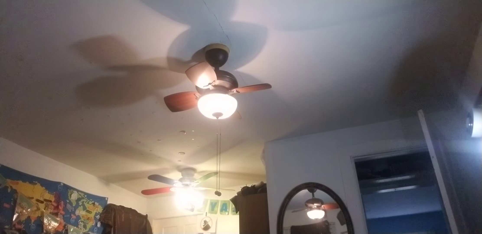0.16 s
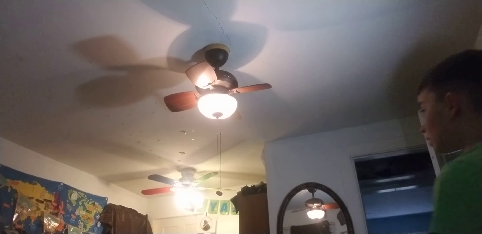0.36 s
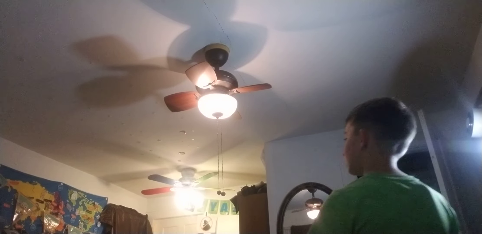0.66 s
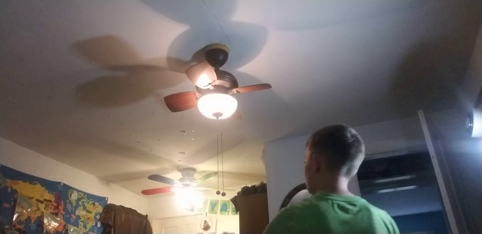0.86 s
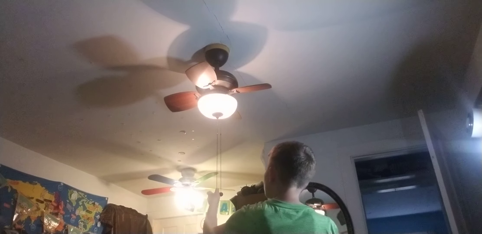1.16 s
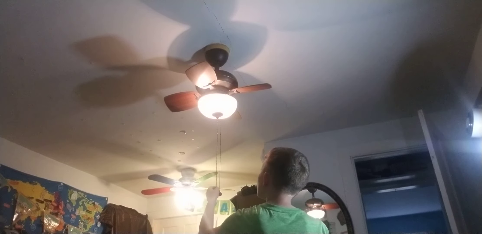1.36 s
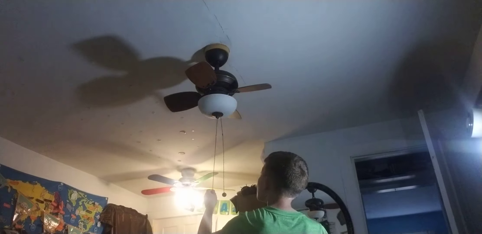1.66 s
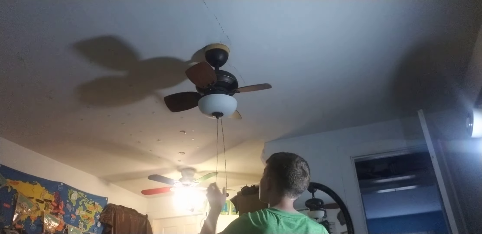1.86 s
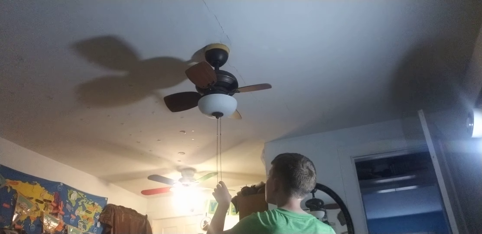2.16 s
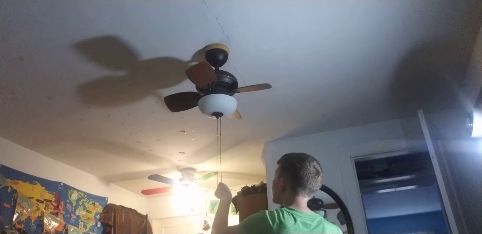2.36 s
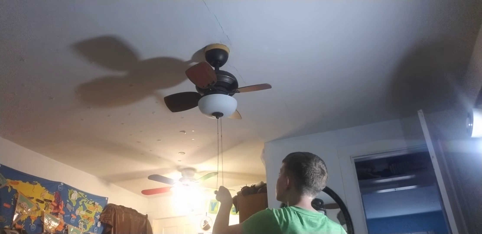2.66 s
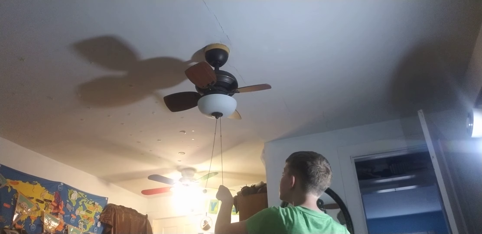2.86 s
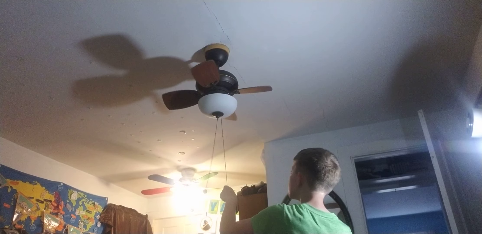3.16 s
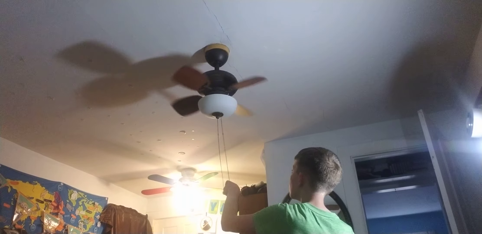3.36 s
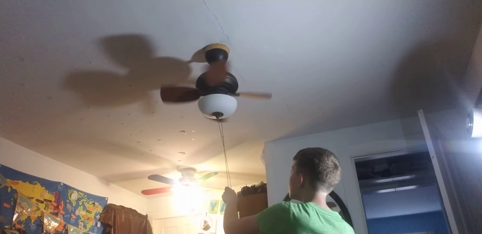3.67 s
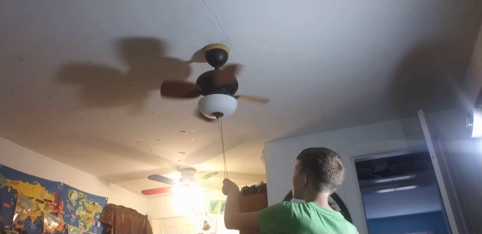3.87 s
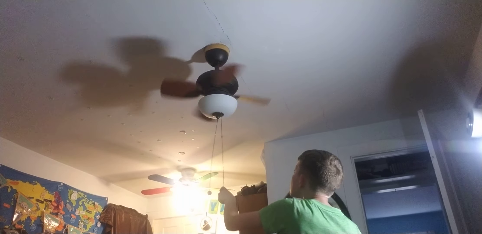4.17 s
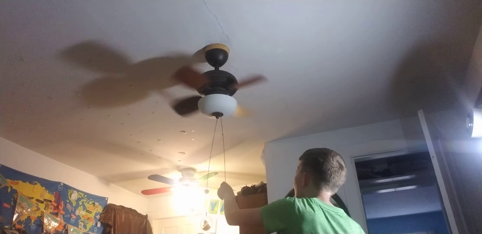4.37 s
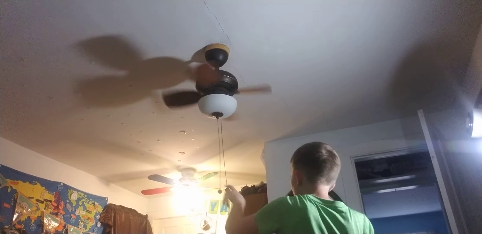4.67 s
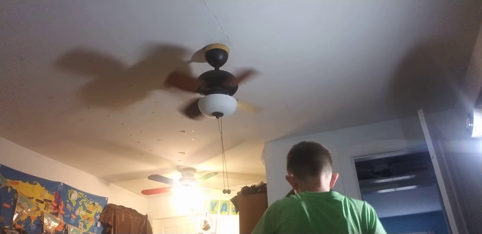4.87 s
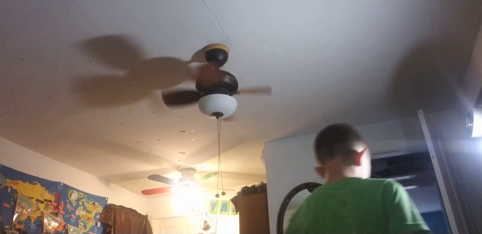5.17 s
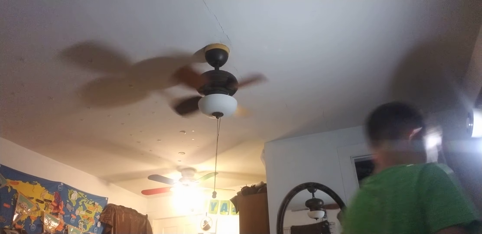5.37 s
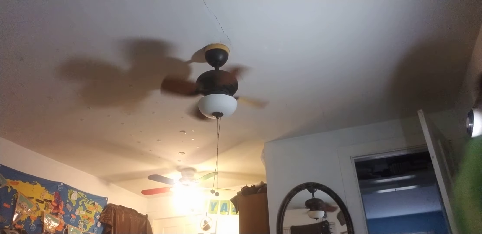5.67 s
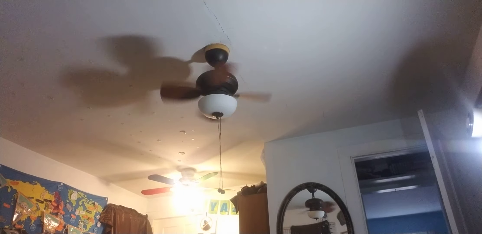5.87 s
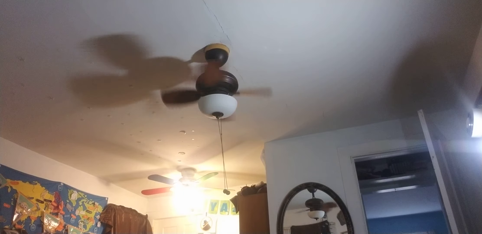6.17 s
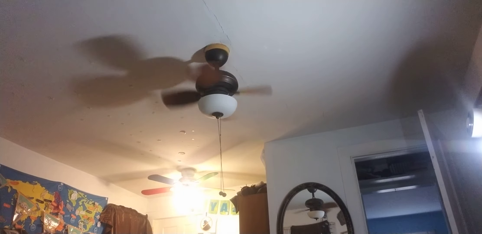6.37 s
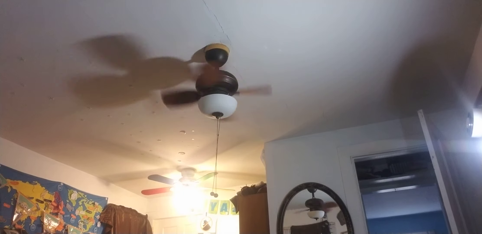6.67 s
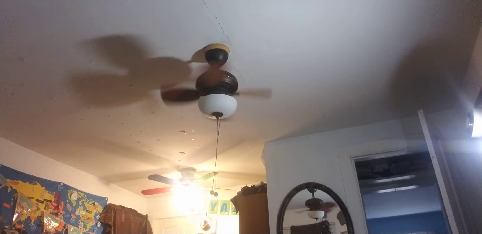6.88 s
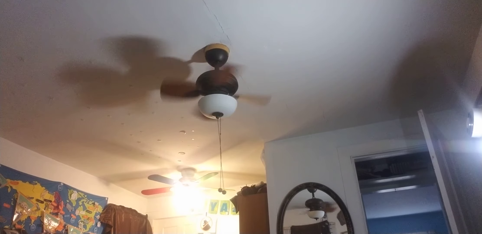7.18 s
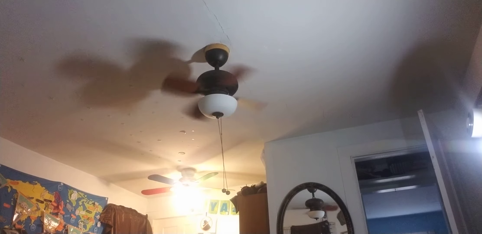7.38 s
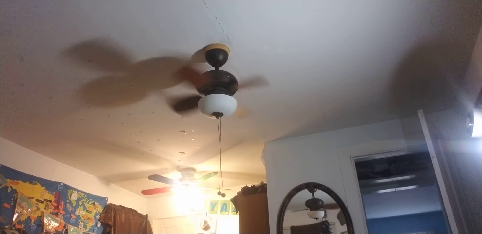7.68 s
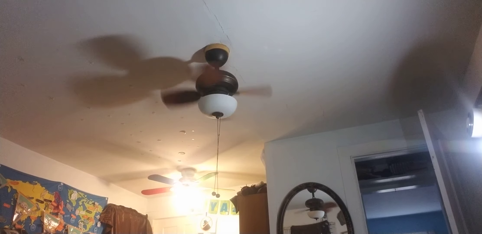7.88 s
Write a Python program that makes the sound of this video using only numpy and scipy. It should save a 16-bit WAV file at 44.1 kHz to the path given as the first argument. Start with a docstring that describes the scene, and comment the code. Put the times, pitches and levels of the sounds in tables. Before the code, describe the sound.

Footsteps approach, a fan's pull chain rasps and clicks repeatedly over a steady low motor hum, then the steps move away.

```python
"""A ceiling fan's pull chains, tugged by a child: once for the light, then several times for the speed.
At each stroke the ball chain goes taut, rasps through its ferrule and catches; then the ratchet switch
snaps, ringing canopy and housing by turns. The dropped pendant clinks. Footsteps boom in the floor and
clothes swish on the way in and out. The stereo microphone stands in a living room, with a motor's hum
and a soft rush of air under everything and two faint, far squeaks at the end."""
import sys
import numpy as np
from scipy import signal
from scipy.fft import rfft, irfft, next_fast_len
from scipy.io import wavfile
from scipy.ndimage import uniform_filter1d, map_coordinates

SR = 44100
rng = np.random.default_rng(int(sys.argv[2]) if len(sys.argv) > 2 else 0)


def waveform_to_disk(signal):
    """Save audio, clipped to [-1, 1], as 16-bit WAV at the path in sys.argv[1]."""
    frames = np.transpose(np.atleast_2d(signal))
    scaled = np.clip(frames, -1, 1) * 32767
    samples = np.round(scaled).astype(np.int16)
    wavfile.write(sys.argv[1], SR, samples)


N = 354167

# Tugs on the chain. Negative seat lands the pawl on the canopy side, positive on the housing side.
# snap_s, snap_db, seat, spring_lift_db, taut_before_snap_s, chain_db, catch_before_snap_s, catch_db
TUGS = [(1.552, -35, 0.081, 11, 0.039, -61, 0.021, -56),
        (1.7204, -39.5, -0.074, -2.5, 0.057, -54, 0.019, -56),
        (2.631, -41, -0.48, -4.5, 0.065, -50.5, .028, -49), (2.938, -32.5, -.9, 1.5, 0.3, -58, .02, -65),
        (3.228, -35.5, 1.1, -0.5, 0.07, -46, .02, -43), (3.528, -32.5, -1.05, 2, 0.073, -44.5, 0.033, -40),
        (3.7951, -32.5, 0.64, 2, .049, -51.5, 0.018, -42.5),
        (4.071, -32.5, -0.84, 0.5, .068, -50.5, 0.035, -38),
        (4.372, -34.5, 1.5, -0.5, 0.087, -49.5, 0.039, -45)]
# Spectrum of the ball chain against its ferrule: frequency_hz, gain_db
CHAIN_SPECTRUM = [(300, -7.5), (900, -4.5), (2200, -10), (3300, -15), (4200, -4.5), (5400, -15),
                  (6400, -6.5), (6850, 3), (7500, -13), (9500, -4), (12200, -1), (15500, -4.5)]


def amp(db):
    """Decibels to gain."""
    return 10 ** (np.asarray(db) / 20)


def unit(x):
    """Scale to rms 1."""
    return x / np.sqrt(np.mean(x ** 2) + 1e-20)


def along(points, hz):
    """Read a curve of (frequency_hz, value) points on a log frequency axis."""
    frequencies, values = np.transpose(points)
    return np.interp(np.log(hz + 1), np.log(frequencies + 1), values)


def peak(hz, centre, width):
    """Bell shape of one resonance, 1 at its centre."""
    return 1 / (1 + (2 * (hz - centre) / width) ** 2)


def clock(seconds):
    """Sample times of a stretch."""
    return np.arange(max(int(seconds * SR), 2)) / SR


def wobble(rate_hz):
    """A smooth random curve through rate_hz knots a second."""
    knots = rng.standard_normal(int(N * rate_hz / SR) + 4)
    return map_coordinates(knots, [np.arange(N) * rate_hz / SR])


def filtered(x, response):
    """Weight the spectrum of x by a gain that depends on frequency."""
    size = next_fast_len(N + SR // 2)
    return irfft(rfft(x, size) * response(np.fft.rfftfreq(size, 1 / SR)), size)[..., :N]


def body(x, gain_db, size=4096):
    """Ring x through a minimum-phase body with the given dB curve of frequency."""
    cepstrum = irfft(np.log(amp(gain_db(np.fft.rfftfreq(size, 1 / SR)))))
    cepstrum[1:size // 2] *= 2
    cepstrum[size // 2 + 1:] = 0
    return signal.fftconvolve(x, irfft(np.exp(rfft(cepstrum))))


def burst(life_s):
    """A short contact: a dying scatter of tiny impacts that carries all frequencies about equally."""
    t = clock(life_s * 8)
    impacts = rng.standard_normal(len(t)) * np.exp(-t / life_s)
    fade = np.cos(np.pi / 2 * t / t[-1]) ** 2
    for _ in range(3):  # each pass flattens the spectrum
        spectrum = rfft(impacts)
        impacts = irfft(spectrum / (np.abs(spectrum) + 1e-9), len(t)) * fade
    return impacts


def stereo_pair(spectra, hz):
    """Two unrelated spectra become the microphone's left and right, alike in the bass."""
    # Likeness of the two channels: frequency_hz, correlation
    likeness = [(120, 0.82), (300, 0.8), (700, 0.39), (1500, 0), (6000, 0)]
    turn = np.arccos(np.clip(along(likeness, hz), -1, 1)) / 2
    mid, side = spectra[0] * np.cos(turn), spectra[1] * np.sin(turn)
    return np.array([mid + side, mid - side])


def in_room(x, direct_db, early_db):
    """The path to the microphone: direct sound, a quick scatter off the ceiling and a diffuse tail."""
    # Reverberation of the living room: frequency_hz, t60_s
    decay = [(100, 0.2), (300, 0.32), (800, 0.25), (2100, 0.3), (5500, 0.24), (14600, 0.2)]
    hz, t, noise = signal.stft(rng.standard_normal((2, 16384)), SR, nperseg=256)
    frames = stereo_pair(noise.transpose(0, 2, 1), hz) * amp(-60 * t[:, None] / along(decay, hz))
    response = signal.istft(frames.transpose(0, 2, 1), SR, nperseg=256)[1]
    t = np.arange(response.shape[1]) / SR
    response *= (1 - np.exp(-t / .0009)) * (1 + amp(early_db) * np.exp(-t / .0035))
    response /= np.linalg.norm(response[0])
    response[:, 0] += amp(direct_db)
    return signal.fftconvolve(x[None], response, axes=1)


def add(track, start_s, sound, db, seconds):
    """Lay a sound in at start_s; db is its rms over the opening seconds."""
    start = round(start_s * SR)
    part = sound[:, max(-start, 0):N - start]
    level = np.sqrt(np.mean(sound[:, :int(seconds * SR)] ** 2))
    track[:, max(start, 0):][:, :part.shape[1]] += part * amp(db) / level


def motor():
    """Magnetic hum at twice the mains, rotor vibration, their sum tone and thin whines."""
    # Course of the rotor's once-a-turn vibration: time_s, relative_db
    vibration = [(0.0, -46.5), (2.01, -55.5), (2.21, -56), (3.26, -51.5), (4.9, -47), (6.31, -50),
                 (6.49, -49), (7.69, -57), (8.03, -64)]
    # Faint whines of the motor housing: pitch_hz, level_db
    whines = [(81.8, -65), (360, -75), (651, -78), (760, -79), (1092, -74), (1114, -80)]
    magnetic_hz, rotor_hz = 120.03, 58.37
    t = np.arange(N) / SR
    magnetic_phase = 2 * np.pi * magnetic_hz * t + .014 * wobble(1.4)
    rotor_phase = 2 * np.pi * rotor_hz * t + .2 * wobble(1.5)
    hum = amp(-41 + .7 * wobble(7)) * np.sin(magnetic_phase)
    hum += amp(.5 + np.interp(t, *np.transpose(vibration))) * np.sin(rotor_phase)
    hum += amp(-57 + 2 * wobble(3.7)) * np.sin(magnetic_phase + rotor_phase)
    for hz, db in whines:
        hum += amp(db + 1.8 * wobble(5)) * np.sin(2 * np.pi * hz * t + .7 * wobble(5))
    return np.sqrt(2) * hum


def air():
    """A soft, dull rush of moving air that wavers a little in level."""
    # Spectrum of the moving air: frequency_hz, gain_db
    spectrum = [(25, -8.5), (55, -2.5), (90, -0.5), (160, -2), (240, -6.5), (500, -12.5), (1100, -17),
                (1350, -24.5), (2100, -34), (5000, -40.5), (8500, -42), (12000, -39.5), (12800, -32.5),
                (13600, -41)]
    level_db = -52.5
    rush = filtered(rng.standard_normal((2, N)), lambda hz: amp(along(spectrum, hz)))
    rush = irfft(stereo_pair(rfft(rush), np.fft.rfftfreq(N, 1 / SR)), N)
    return unit(rush) * amp(level_db + .8 * wobble(2.6))


def clothes():
    """Cloth and soles slide in soft, grainy swells; a scuffing sole also rings the floor."""
    # Clear swishes of cloth and soles, and at 4.61 s the released chain sliding through the hand: centre_s,
    # half_length_s, level_db, scuff_db, treble_db
    swishes = [(0.028, 0.049, -59, 2, 7.5), (0.887, .029, -59.5, 11, 0), (1.257, .04, -56, 0.5, -7),
               (4.61, 0.035, -63.5, -20, 15), (5.266, 0.024, -66, -7, -2), (5.338, .037, -62, 10, 1),
               (5.436, 0.025, -59, -1, 2), (5.595, 0.012, -66, -37, -3), (5.852, 0.04, -50.5, 18, 2),
               (6.187, .062, -54.5, 8, 3.5), (6.733, .051, -63, -18, 11.5), (7.34, .055, -69, -5, 9)]
    # Spectrum of sliding cloth: frequency_hz, gain_db
    cloth = [(200, -0.5), (1000, 4.5), (2500, 1), (5000, -2.5), (8000, -4.5), (12500, -0.5), (15500, -4)]
    out = np.zeros((2, N))
    for centre_s, half_s, db, scuff_db, treble_db in swishes + rustles():
        t = clock(4 * half_s)
        grain = rng.standard_normal(len(t)) * amp(7.6 * rng.standard_normal(len(t)))
        swell = np.exp(-(t / half_s - 2) ** 2)
        treble = [(4000, 0), (13000, treble_db)]
        colour = lambda hz: along(cloth, hz) + scuff_db * peak(hz, 1040, 770) + along(treble, hz)
        swish = in_room(body(grain * swell, colour), direct_db=-8, early_db=9)
        add(out, centre_s - 2 * half_s - .012, swish, db - .5, seconds=4 * half_s)
    return out


def rustles():
    """Faint swishes at loose intervals while the child walks, as rows for clothes()."""
    # Walking in and out: start_s, end_s
    walks = [(.15, 1.2), (5.25, 6.7)]
    gap_s, half_s, level_db, scatter_db, treble_db = .16, .06, -75.5, 2.2, 5
    times = np.concatenate([np.arange(start_s, end_s, gap_s) for start_s, end_s in walks])
    return [(s + late * gap_s / 4, half_s, level_db + scatter_db * loud, 0, treble_db)
            for s, (late, loud) in zip(times, rng.standard_normal((len(times), 2)))]


def footsteps():
    """Heel, then forefoot: each knocks a floorboard, booms in the floor and taps with the sole."""
    # Footfalls: start_s, board_hz, knock_db, boom_db, tap_db, heel_to_forefoot_s
    steps = [(.207, 293, -53, -65, -50.5, 0.027), (.393, 163, -38.5, -52, -56.5, 0.066),
             (0.949, 165, -42, -69, -58.5, 0.043), (4.666, 261, -42, -65, -49, .018),
             (4.855, 216, -52, -61, -52, 0.058), (5.331, 187, -33.5, -41.5, -61, 0.031),
             (5.784, 173, -44.5, -67, -59, 0.055), (5.923, 167, -41.5, -49, -55, 0.062),
             (6.106, 136, -38, -38.5, -51.5, .036), (6.487, 142, -41, -40, -52.5, 0.091)]
    # Spectrum of the floor's boom: frequency_hz, gain_db
    boom = [(20, -8), (42, -3), (62, 0), (100, -15), (220, -43), (600, -93)]
    # Spectrum of the sole's tap: frequency_hz, gain_db
    tap = [(120, -38), (350, 9), (900, 6), (1700, -7), (4000, -16.5), (15000, -20)]
    bass_cut = [(30, -12.5), (110, 3)]  # frequency_hz, gain_db
    out = np.zeros((2, N))
    for start_s, board_hz, knock_db, boom_db, tap_db, roll_s in steps:
        board = lambda hz: 17 * np.log10(peak(hz, board_hz, .72 * board_hz)) + along(bass_cut, hz)
        parts = ((board, knock_db, -6.5, .007),
                 (lambda hz: along(boom, hz), boom_db, -1.5, .016),
                 (lambda hz: along(tap, hz), tap_db, -3.5, .006))
        for colour, heel_db, forefoot_offset_db, life_s in parts:
            for at_s, db in ((start_s, heel_db), (start_s + roll_s, heel_db + forefoot_offset_db)):
                impact = in_room(body(burst(life_s), colour), direct_db=-6.5, early_db=-8)
                add(out, at_s, impact, db - 2.5, seconds=.053)
    return out


def ball_tick(ring_db):
    """One ball hits the rim and rings the ferrule's two resonances."""
    ferrule = lambda hz: ring_db * peak(hz, 6740, 570) + (10.5 + ring_db / 3) * peak(hz, 4270, 550)
    tick = body(burst(life_s=.00062), lambda hz: along(CHAIN_SPECTRUM, hz) + ferrule(hz))
    return in_room(tick, direct_db=-15.5, early_db=-12.5)


def ball_rasp(length_s, rise_db, spectrum):
    """Balls tick at an uneven rate; the level moves by rise_db from first to last."""
    balls_per_s, scatter_db = 150, 3.8
    t = clock(length_s)
    times = np.cumsum(rng.uniform(.3, 1.7, size=128)) / balls_per_s
    times -= times[0] / 2
    hits = (times[times < t[-1]] * SR).astype(int)
    ticks = np.zeros(len(t))
    ticks[hits] = amp(rise_db * t[hits] / length_s + scatter_db * rng.standard_normal(len(hits)))
    balls = body(signal.fftconvolve(ticks, burst(life_s=.00014)), lambda hz: along(spectrum, hz))
    return in_room(balls, direct_db=-11, early_db=9)


def pull_chain():
    """In each tug the chain jerks taut and runs, a ball catches, and it drags on harder until the snap."""
    # The slack chain swings and touches the rim: start_s, level_db
    touches = [(1.9, -65.5), (2.058, -69.5), (3.669, -66)]
    run_fade_db_per_s, drag_rise_db = 33, 1.2  # the run slows down; after the catch the chain tightens
    out = np.zeros((2, N))
    for snap_s, _, seat, _, taut_lead_s, chain_db, catch_lead_s, catch_db in TUGS:
        taut_s, catch_s = snap_s - taut_lead_s, snap_s - catch_lead_s
        run_s, drag_s = np.maximum([taut_lead_s - catch_lead_s, catch_lead_s], .02)
        add(out, taut_s, ball_tick(ring_db=3.5 - 16 * seat), chain_db - 2.5, seconds=.041)
        add(out, taut_s, ball_rasp(run_s, -run_fade_db_per_s * run_s, CHAIN_SPECTRUM), chain_db, run_s)
        # A caught ball is pressed tight and hardly rings.
        add(out, catch_s, ball_tick(ring_db=-5), catch_db, seconds=.076)
        add(out, catch_s, ball_rasp(drag_s, drag_rise_db, CHAIN_SPECTRUM), catch_db - 4.5, drag_s)
    for start_s, db in touches:
        add(out, start_s, ball_tick(ring_db=12), db, seconds=.051)
    return out


def ratchet_switch():
    """The spring snaps over; the side the pawl lands on decides whether canopy or housing rings."""
    # Spectrum of the switch in its metal housing: frequency_hz, gain_db
    spectrum = [(150, -3), (350, -3), (800, -5.5), (1300, -9), (2100, -7), (2800, -5), (3350, -9),
                (4000, -0.5), (4550, -5.5), (5400, -8), (6700, -5), (7600, -9), (9100, -9), (12100, -5),
                (15500, -10.5)]
    # Metal resonances of the fixture: pitch_hz, width_hz, lift_db
    resonances = [(707, 82, 5), (886, 67, 8.5), (1034, 50, 10.5), (1673, 85, 8), (1900, 35, 6),
                  (2032, 31, 10), (2470, 45, 8.5), (2885, 49, 8.5), (3940, 60, 6), (4180, 170, 1),
                  (4626, 210, 10), (6540, 31, 6.5), (8900, 160, 6.5), (10400, 170, 6), (11980, 300, 6),
                  (12250, 300, 4)]
    # Canopy, housing, shell, ferrule and spring: frequency_hz, gain_db, db_per_seat, spring_share
    parts = [(800, -5.5, -5, -0.15), (2040, -3, 4, -0.035), (4400, -6, 0.2, -0.18), (8000, -2.5, 1, 0.35),
             (12800, 0, 0.5, 0.96)]
    full_snap_db, crack_db_per_db = -32.5, 1.3
    out = np.zeros((2, N))
    for snap_s, db, seat, spring_db, *_ in TUGS:
        scatter_db = 2.4 * rng.standard_normal(len(resonances))
        rings = lambda hz: sum((lift_db + extra_db) * peak(hz, centre, width)
                               for (centre, width, lift_db), extra_db in zip(resonances, scatter_db))
        balance = [(hz, part_db + seat * db_per_seat + share * spring_db)
                   for hz, part_db, db_per_seat, share in parts]
        snap = body(burst(life_s=.002), lambda hz: along(spectrum, hz) + rings(hz) + along(balance, hz))
        add(out, snap_s, in_room(snap, direct_db=-10, early_db=3), db - .5, seconds=.05)
        # The shell takes the blow itself: a hard, quickly damped crack that weak snaps mostly lack.
        crack = body(burst(life_s=.00076), lambda hz: 16 * np.log10(peak(hz, 4200, 490)))
        crack_db = db - 11 + crack_db_per_db * (db - full_snap_db) - .9 * spring_db
        add(out, snap_s + .001, in_room(crack, direct_db=1, early_db=10), crack_db, seconds=.05)
    return out


def pendant():
    """The released chain jingles and its brass pendant clinks three times against the other chain."""
    # Spectrum of loose balls knocking together: frequency_hz, gain_db
    jingle = [(900, -14), (2000, -7), (3600, 3), (6500, -7), (9000, -15), (15500, -13)]
    # Modes of the pendant: pitch_hz, level_db, t60_s
    modes = [(3569, 0, .3), (6320, -9, .18), (8080, -6, .2), (9550, -1, .14), (10370, -4, .2),
             (13500, -4, .15)]
    drop_s, jingle_s, clink_gap_s = 4.664, .12, .025
    out, t = np.zeros((2, N)), clock(.4)
    add(out, drop_s, ball_rasp(jingle_s, rise_db=-7, spectrum=jingle), db=-58.5, seconds=jingle_s)
    for knock in (1, 2, 3):
        ring = np.zeros(len(t))
        for hz, db, t60_s in modes:
            pair_hz = hz + 15 * rng.standard_normal((2, 1))  # close pairs flutter
            envelope = amp(db + rng.normal(0, 1.1) - 60 * t / t60_s)
            ring += envelope * np.sin(2 * np.pi * pair_hz * t).sum(0)
        clink = in_room(ring, direct_db=-5, early_db=-19)
        add(out, drop_s + knock * clink_gap_s, clink, db=-60, seconds=.065)
    return out


def squeaks():
    """Short, raspy glides from across the room."""
    # Faint, far squeaks: start_s, length_s, from_hz, to_hz, level_db, overtones_db
    glides = [(7.402, 0.06, 2130, 2343, -60.5, -5), (7.652, 0.16, 2500, 2290, -74.5, -25)]
    out = np.zeros((2, N))
    for start_s, length_s, from_hz, to_hz, db, overtones_db in glides:
        t = clock(length_s)
        jitter = unit(uniform_filter1d(rng.standard_normal(len(t)), SR // 1500))
        pitch_hz = np.linspace(from_hz, to_hz, len(t)) * (1 + .59 * (to_hz / from_hz - 1) * jitter)
        phase = 2 * np.pi * np.cumsum(pitch_hz) / SR
        tone = np.sin(phase) + amp(overtones_db) * (np.sin(2 * phase) + .37 * np.sin(3 * phase))
        add(out, start_s, in_room(tone * np.hanning(len(t)), direct_db=-4, early_db=-5), db, length_s)
    return out


def lean_left(hz):
    """Left and right gains at constant power: the microphone's left side hears more upper midrange."""
    # frequency_hz, left_minus_right_db
    lean = [(150, 1.5), (380, 3.5), (700, -.5), (1300, 9), (4400, 4.5), (8100, 5.5), (14000, -2.5)]
    gains = amp(np.outer([1, -1], along(lean, hz)) / 2)
    return gains / np.sqrt(np.mean(gains ** 2, axis=0))


def scene():
    """The hum fills the room evenly; everything else sits a little to the microphone's left."""
    fan = ratchet_switch() + pull_chain() + pendant()
    child = footsteps() + clothes()
    background = squeaks() + air()
    return motor() + filtered(fan + child + background, lean_left)


def record(dry):
    """The microphone keeps nothing above its band limit."""
    limit_hz = 15850
    return filtered(dry, lambda hz: hz < limit_hz)


dry = scene()
out = record(dry)
waveform_to_disk(out)
```